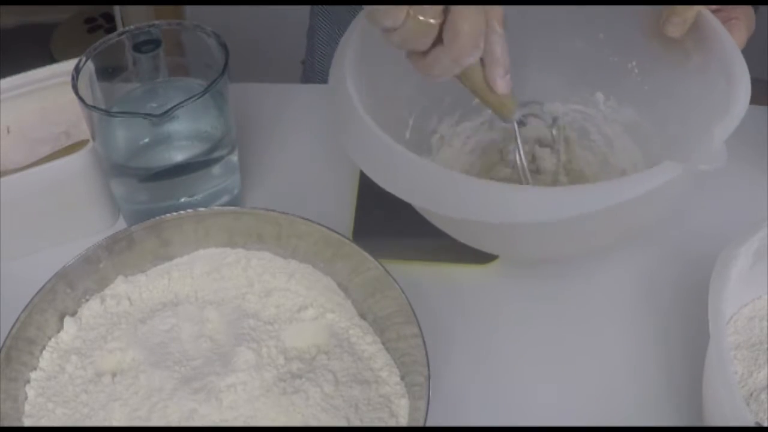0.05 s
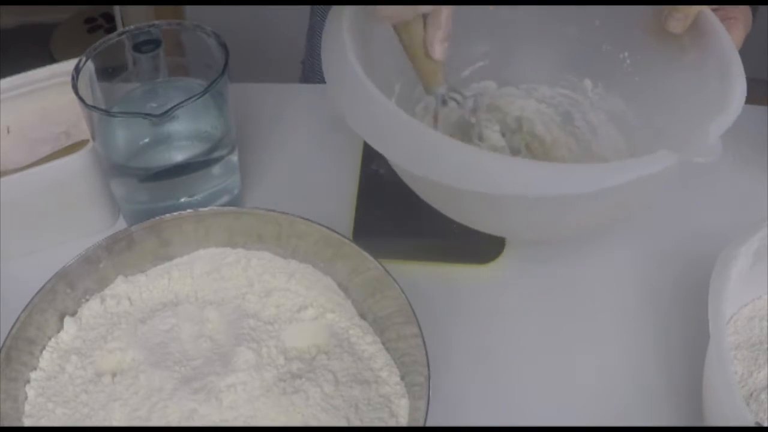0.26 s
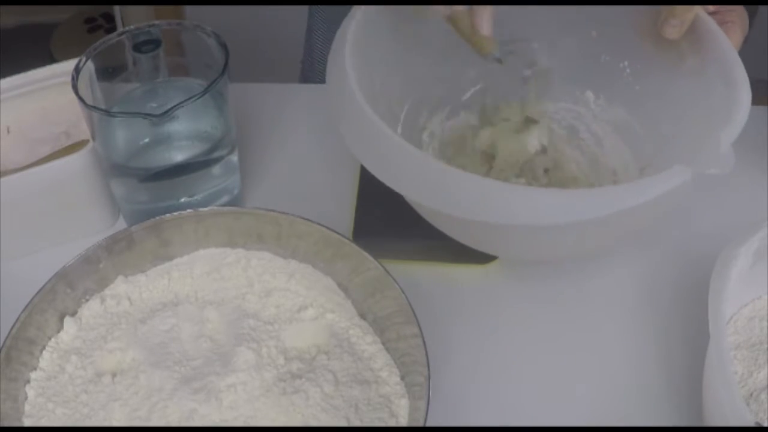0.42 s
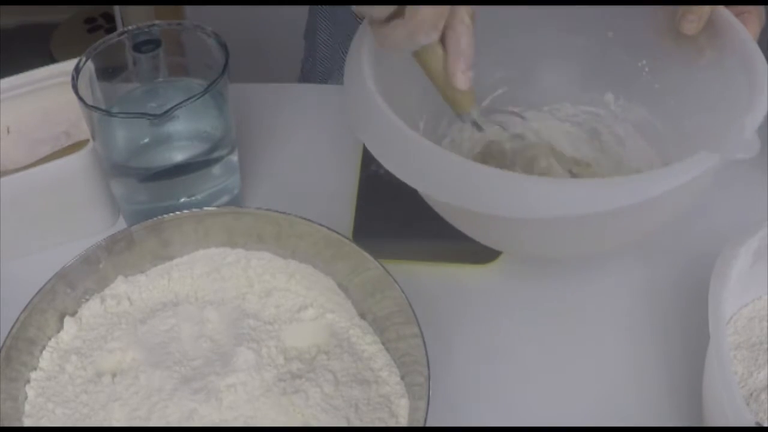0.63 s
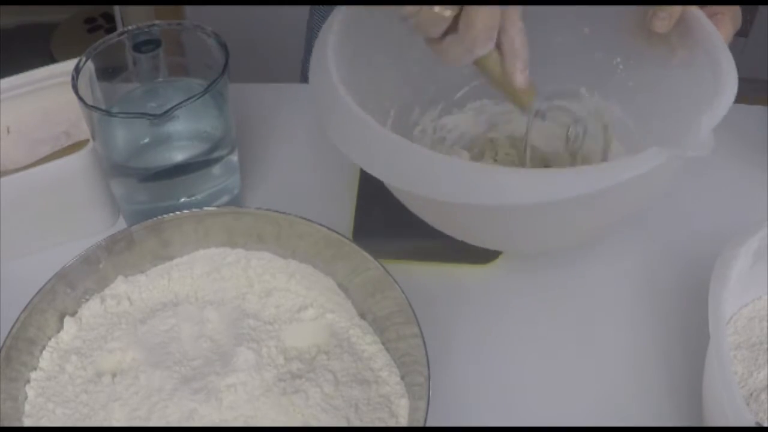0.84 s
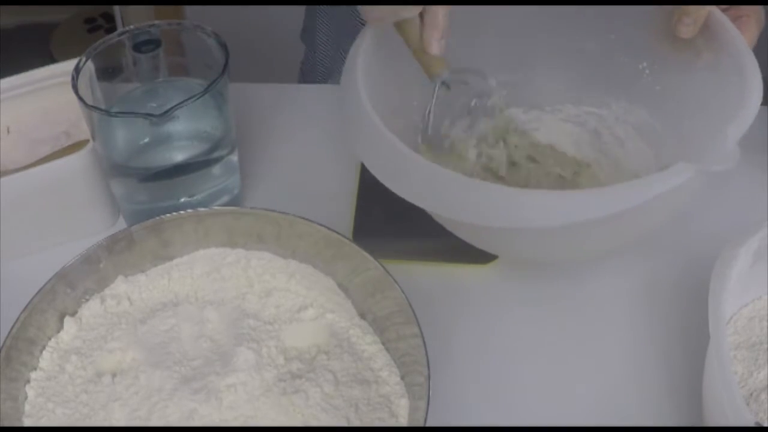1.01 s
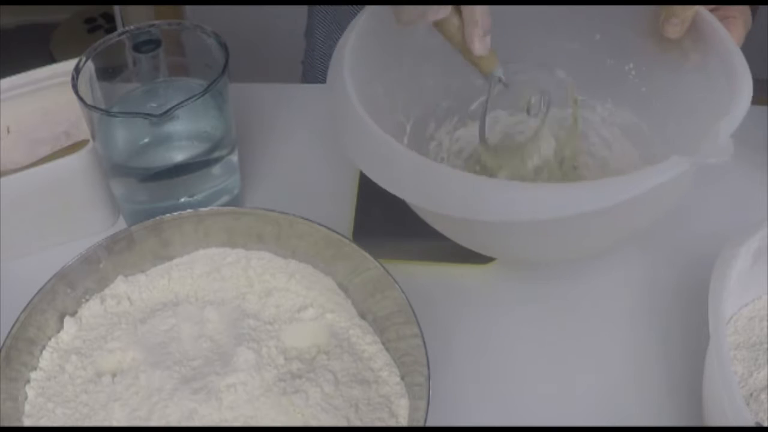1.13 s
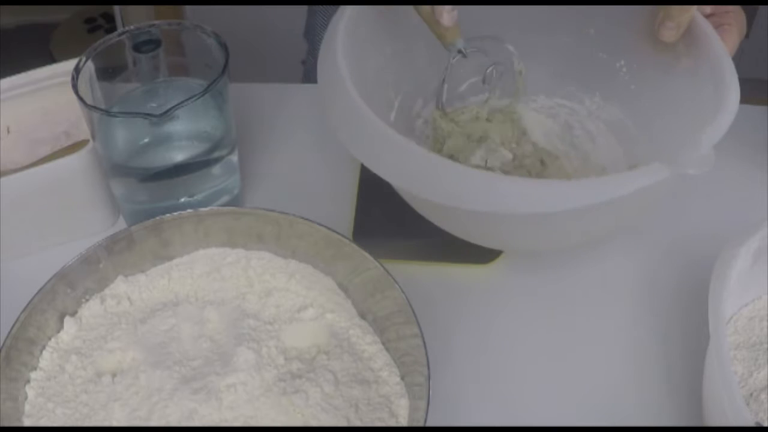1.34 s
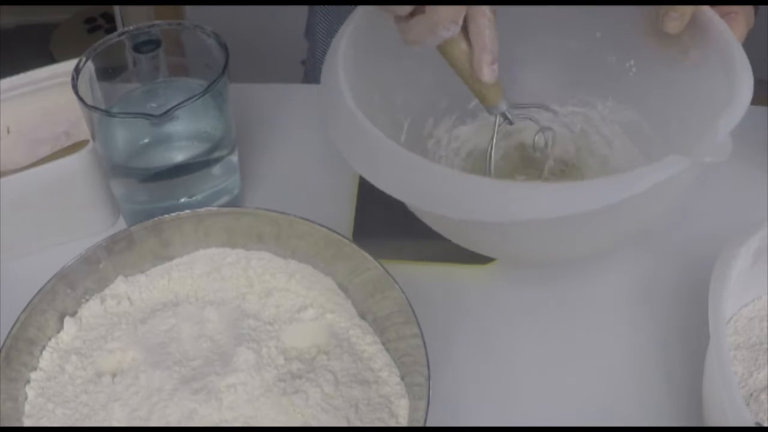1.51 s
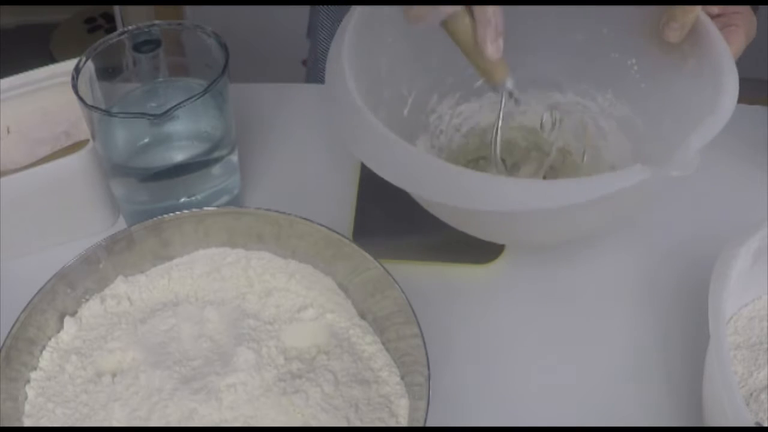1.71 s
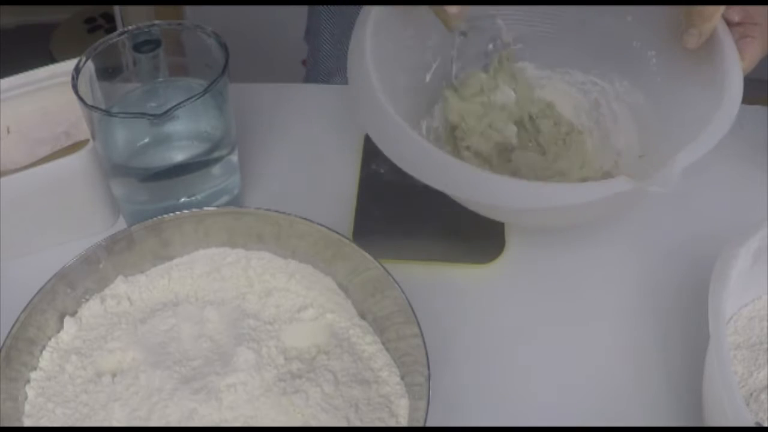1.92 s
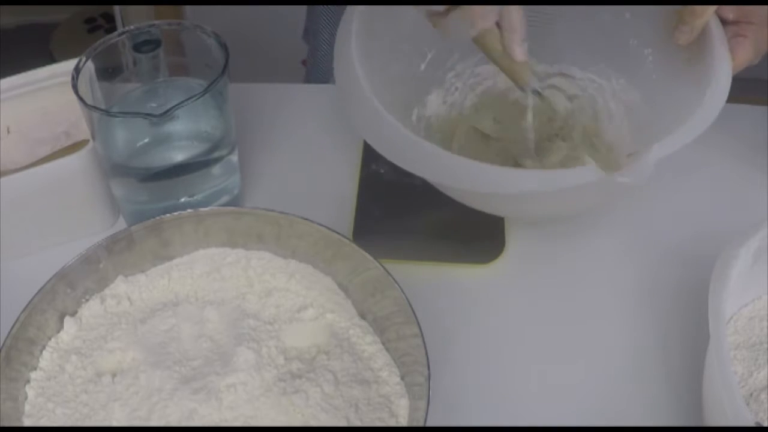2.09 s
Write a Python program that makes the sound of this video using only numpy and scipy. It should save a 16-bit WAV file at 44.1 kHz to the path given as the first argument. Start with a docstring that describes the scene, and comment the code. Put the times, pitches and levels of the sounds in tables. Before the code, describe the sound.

A wire whisk stirs stiff dough in a plastic bowl, rasping along the wall with one hollow thump. Softer knocks, wire clicks and a brief squeak follow, then more scraping, close by in a small, slightly echoing kitchen.

```python
"""A wire whisk works stiff dough round a plastic mixing bowl on a kitchen counter, in three turns.
First the wires rasp along the floury wall and knock the bowl, whose hollow thump carries into the counter.
Free wires graze and chirp faintly; the second turn brings softer knocks, clicks of wire on wire and rasps.
Then a wire sticks and squeaks, and the last turn clicks, knocks and rasps to the end.
A small hard kitchen reverberates throughout."""
import sys
import numpy as np
from scipy import signal
from scipy.fft import rfft, irfft, next_fast_len
from scipy.io import wavfile

SR = 44100
rng = np.random.default_rng(int(sys.argv[2]) if len(sys.argv) > 2 else 0)


def master(y):
    """Save y as 16-bit WAV."""
    cut = np.clip(np.atleast_2d(y).T, -1, 1)
    pcm = np.round(cut * 32767)  # scale
    wavfile.write(sys.argv[1], SR, pcm.astype(np.int16))


N = 94815
TIME = np.arange(N) / SR


def from_db(db):
    """Amplitude ratio of a level in decibels."""
    return 10 ** (np.asarray(db) / 20)


def unit_rms(x):
    """Normalisation to unit power."""
    return x / np.sqrt(np.mean(x ** 2) + 1e-20)


def at_hz(points, hz):
    """Interpolation on a log-frequency axis."""
    freqs, values = np.transpose(points)
    return np.interp(np.log(np.maximum(hz, 1)), np.log(freqs), values)


def colour(x, spectrum):
    """Spectral shaping by a table of gains."""
    n = x.shape[-1]
    size = next_fast_len(n)
    gain = from_db(at_hz(spectrum, np.fft.rfftfreq(size, 1 / SR)))
    return irfft(rfft(x, size) * gain, size)[..., :n]


def band_limit(x, order, hz, kind):
    """A maximally flat filter."""
    return signal.sosfilt(signal.butter(order, hz, kind, fs=SR, output="sos"), x)


def resonate(x, hz, width_hz):
    """A two-pole resonance with unit peak gain."""
    r = np.exp(-np.pi * width_hz / SR)
    feedback = [1, -2 * r * np.cos(2 * np.pi * hz / SR), r * r]
    return signal.lfilter(np.array([1, 0, -1]) * (1 - r * r) / 2, feedback, x + 1e-18)


def swell(peak_s, rise_s, fall_s):
    """A bell-shaped envelope; rise and fall are standard deviations."""
    return np.exp(-.5 * ((TIME - peak_s) / np.where(TIME < peak_s, rise_s, fall_s)) ** 2)


def slips(per_s=5000, spread_db=3.5):
    """Friction as shot noise: tiny random slips of wire over floury plastic, uneven in size."""
    sizes = from_db(spread_db * np.minimum(rng.exponential(1, N), 4)) * rng.choice([-1, 1], N)
    return sizes * (rng.random(N) < per_s / SR)


# Resonances of the bowl: pitch_hz, level_db, t60_s
BOWL_MODES = [(411.9, -25, 0.12), (445.7, -23.5, 0.1), (473.6, -29.5, 0.41), (516.4, -35, 0.19),
              (622, -47, 0.099), (900, -22, 0.024), (986, -32, 0.15), (1200, -29.5, 0.074),
              (1439, -28, .05), (1594, -22.5, .04), (1774, -22, .05), (1978, -34, 0.06), (2110, -30, 0.064),
              (2374, -19, 0.01), (2805, -26, 0.043), (3015, -24.5, .06)]
HOLLOW_TOP_HZ = 600  # modes of the hollow lie below, modes of the wall above
def bowl(friction, modes):
    """Forced vibration: friction drives a set of bowl modes, the strongest with unit gain."""
    strongest = max(from_db(db) * t60 for _, db, t60 in modes)
    return sum(from_db(db) * t60 / strongest * resonate(friction, hz, np.log(1000) / (np.pi * t60))
               for hz, db, t60 in modes)


# Spectra of the wall's rasp and the flour's hiss: frequency_hz, gain_db
RASP_SPECTRUM = [(300, -27.5), (740, -13), (900, 1), (1250, 2), (1800, -3.5), (2900, -1), (3400, 2.5),
                 (6000, 6), (12000, -26)]
HISS_SPECTRUM = [(800, -15.5), (1300, -23.5), (2500, -16), (4200, 0.5), (6000, 10), (8500, 14.5),
                 (10000, 9.5), (12000, 5)]
# Drags along the wall: peak_s, rise_s, fall_s, rasp_db, rasp_centre_hz, hiss_db, drone_db
DRAGS = [(0.011, 0.073, 0.018, -37.5, 1960, -43.5, -39.5), (0.098, 0.19, 0.091, -70.5, 846, -57.5, -67),
         (0.201, 0.013, 0.0061, -60, 1740, -82, -51.5), (0.211, 0.0011, 0.022, -36.5, 1620, -49, -22.5),
         (0.260, 0.0091, 0.0089, -36, 1970, -45.5, -29.5), (0.292, 0.012, 0.024, -37.5, 1834, -45, -62.5),
         (0.313, 0.0049, 0.02, -39.5, 2440, -44, -39), (0.619, 0.095, 0.064, -87.5, 2465, -73.5, -62),
         (0.704, 0.011, 0.019, -95.5, 3600, -60, -67), (0.754, 0.012, 0.0074, -101, 2400, -56, -62),
         (0.961, 0.0079, 0.035, -99, 2400, -67, -51.5), (0.998, 0.0078, 0.0023, -83, 3930, -45.5, -43.5),
         (1.024, 0.017, 0.087, -76, 3600, -57.5, -63), (1.09, 0.016, 0.031, -43.5, 2200, -49, -48.5),
         (1.109, 0.023, 0.014, -48, 1057, -56, -44.5), (1.14, 0.02, 0.013, -39.5, 1970, -48, -66),
         (1.209, 0.037, 0.027, -45.5, 2150, -52, -52.5), (1.535, 0.0057, 0.014, -92, 2820, -65.5, -97),
         (1.587, 0.0078, 0.076, -61, 1110, -95, -50), (1.674, 0.012, 0.012, -49.5, 2900, -39, -68.5),
         (1.699, 0.02, 0.028, -59.5, 2830, -67, -45), (1.753, 0.022, 0.026, -41, 2050, -48, -46.5),
         (1.808, 0.0046, 0.0075, -36, 2430, -55, -60.5), (1.851, 0.025, 0.051, -47.5, 2090, -48.5, -51.5),
         (1.887, 0.015, 0.013, -33.5, 2380, -47, -49.5), (1.966, 0.0041, 0.012, -38, 2110, -48, -60),
         (2.016, 0.036, 0.081, -44.5, 1880, -49.5, -46.5), (2.143, 0.019, 0.036, -37.5, 1960, -46, -35)]
def scrapes(direct_db=-4, wall_ring_db=2, catch_db=2):
    """Sliding friction: each drag judders, the wall rasps, the flour hisses and the hollow drones."""
    grit = colour(slips(), RASP_SPECTRUM)
    rasp = hiss_power = drone_power = 0
    for peak_s, rise_s, fall_s, rasp_db, centre_hz, hiss_db, drone_db in DRAGS:
        push = swell(peak_s, rise_s, fall_s)
        rub = resonate(np.roll(grit, rng.integers(N)), centre_hz, width_hz=500)
        rub = band_limit(rub, 2, 0.69 * centre_hz, "high")
        rasp += from_db(rasp_db) * push * unit_rms(rub)
        hiss_power += (from_db(hiss_db) * push) ** 2
        drone_power += (from_db(drone_db) * push) ** 2
    # The wires catch and let go unevenly, modulating rasp and hiss.
    judder = unit_rms(resonate(rng.standard_normal(N), hz=185, width_hz=230))
    catches = unit_rms(from_db(catch_db * np.clip(judder, -2, 2)))
    rasp = band_limit(rasp * catches, 4, 770, "high")
    wall = bowl(rasp, [mode for mode in BOWL_MODES if mode[0] > HOLLOW_TOP_HZ])
    hollow = signal.hilbert(bowl(slips(), [mode for mode in BOWL_MODES if mode[0] < HOLLOW_TOP_HZ]))
    steadied = np.real(hollow) / np.sqrt(np.abs(hollow))  # halves the level swings in decibels
    drone = np.sqrt(drone_power) * unit_rms(band_limit(steadied, 4, [345, HOLLOW_TOP_HZ], "band"))
    hiss = np.sqrt(hiss_power * catches) * unit_rms(colour(slips(), HISS_SPECTRUM))
    return from_db(direct_db) * rasp + from_db(wall_ring_db) * wall + hiss + drone


# Thin notes of the whisk: pitch_hz, gain_db
WIRE_NOTES = [(3820, -1.5), (4200, -2), (4720, 6), (5130, 1), (5380, 5), (5815, -1.5), (6140, 1),
              (7100, 2.5), (8580, -7)]
def wires(friction):
    """Narrow resonances draw the wires' notes out of broadband friction."""
    return sum(from_db(db) * resonate(friction, hz, width_hz=45) for hz, db in WIRE_NOTES)


def whisk(friction, notes_db=-4):
    """Sympathetic vibration: damped by dough, the wires sing faintly along with what rubs them."""
    return friction + from_db(notes_db) * wires(friction)


# Reverberation times of the kitchen: frequency_hz, t60_s
ROOM_DECAY = [(200, 0.82), (450, 0.47), (1000, 0.56), (2500, 0.37), (6000, 0.67), (11000, 0.56)]
# Side signal of the tail, relative to its mid signal: frequency_hz, gain_db
ROOM_SIDE_SPECTRUM = [(200, -7.5), (450, -15), (1000, 1.5), (2000, -14.5), (5000, -45), (8000, -45.5),
                      (12000, -25.5)]
def kitchen(x, delay_s=0.0027, tail_s=.8):
    """Diffuse reverberation: a noise tail decays band by band, much alike in both ears."""
    t = TIME[:int(tail_s * SR)]
    hz = np.fft.rfftfreq(len(t), 1 / SR)
    white, tail = rfft(rng.standard_normal((2, len(t)))), 0
    for band_hz, t60 in ROOM_DECAY:
        share = at_hz([(f, f == band_hz) for f, _ in ROOM_DECAY], hz)
        decay = from_db(-60 * t / t60) * (t > delay_s)
        tail += irfft(white * share, len(t)) * decay / np.linalg.norm(decay)
    mid, side = tail[0], colour(tail[1], ROOM_SIDE_SPECTRUM)
    return np.array([signal.fftconvolve(x, ear)[:N] for ear in (mid + side, mid - side)])


# Spectrum of the background: frequency_hz, gain_db
BACKGROUND_SPECTRUM = [(60, -3.5), (450, -7), (1000, -33), (3000, -26), (7000, -6.5), (12000, -8)]
def background(level_db=-78.5):
    """Faint stationary noise, partly correlated between the ears."""
    noise = rng.standard_normal(N) + 0.7 * rng.standard_normal((2, N))
    return from_db(level_db) * unit_rms(colour(noise, BACKGROUND_SPECTRUM))


# Blows of the whisk on the bowl: peak_s, level_db, pitch_hz, wall_ring_db, right_ear_lead_rad
BLOWS = [(0.2144, -8, 446.3, -2.5, 0.58), (0.236, -52, 475, -1, 0.4), (0.248, -32.5, 496, -17, .35),
         (0.968, -30, 424, -12, 0.13), (0.987, -42, 513, -3.5, 0.12), (1.056, -45, 420, 23, 0.092),
         (1.088, -34.5, 446, -11, 0.076), (1.598, -26, 418, 12.5, 0.14), (1.718, -34.5, 428, -11, .07),
         (1.903, -34, 457, -48, 0.036), (1.999, -37, 480, -14, 0.052), (2.119, -34, 445, -10, 0.056)]
THUMP_RISE_S, THUMP_FALL_S = 0.002, 0.0045  # for a blow at full strength
def knocks(wall_db_per_octave=-13):
    """Cushioned impact: dough softens the blow, so the bowl thumps and its high modes ring weakly."""
    out = np.zeros((2, N))
    for peak_s, level_db, pitch_hz, wall_db, lead_rad in BLOWS:
        t = TIME - peak_s
        rise_s = THUMP_RISE_S * from_db(-.14 * level_db)  # gentler blows swell more slowly
        thump = swell(peak_s, rise_s, THUMP_FALL_S) * np.exp(2j * np.pi * pitch_hz * t)
        rings = 0
        for hz, mode_db, t60 in BOWL_MODES:
            if hz > HOLLOW_TOP_HZ:
                mode_db += wall_db + wall_db_per_octave * np.log2(hz / pitch_hz)
            rings += from_db(mode_db - 60 * np.maximum(t, 0) / t60) * np.exp(2j * np.pi * hz * t)
        ear_phase = np.exp(1j * lead_rad * np.array([[-.5], [.5]]))
        out += from_db(level_db) * np.real((thump + rings * swell(peak_s, rise_s, np.inf)) * ear_phase)
    return band_limit(out, 2, 148, "high")  # a small bowl radiates little bass


# Shifts of the bowl on the counter: peak_s, width_s, level_db
BOWL_SHIFTS = [(0.21, 0.017, -60), (0.57, 0.029, -67), (0.712, 0.05, -70)]
# Spectrum of their rumble: frequency_hz, gain_db
RUMBLE_SPECTRUM = [(20, 12), (50, -1), (100, -14.5), (200, -18.5), (320, -30.5)]
def counter(pitch_hz=232, thud_db=-55, t60_s=0.2):
    """Structure-borne sound: the first, hardest knock rings the counter; the shifting bowl rumbles."""
    t = np.maximum(TIME - BLOWS[0][0] + 2 * THUMP_RISE_S, 0)
    thud = from_db(thud_db - 60 * t / t60_s) * np.sin(2 * np.pi * pitch_hz * t)
    shifting = sum(from_db(db) * swell(peak_s, width_s, width_s) for peak_s, width_s, db in BOWL_SHIFTS)
    noise = rng.standard_normal(N) + rng.standard_normal((2, N))
    return thud + shifting * unit_rms(colour(noise, RUMBLE_SPECTRUM))


# Light touches of free wires on the wall: peak_s, width_s, level_db
LIGHT_TOUCHES = [(0.701, 0.023, -68.5), (1.46, 0.061, -73)]
def grazes():
    """Resonant excitation: wires clear of the dough brush the wall, and only their notes are heard."""
    touch = sum(from_db(db) * swell(peak_s, width_s, width_s) for peak_s, width_s, db in LIGHT_TOUCHES)
    return touch * unit_rms(wires(slips()))


# Brief slips of a wire: peak_s, width_s, pitch_hz, level_db
WIRE_CHIRPS = [(0.704, 0.0091, 3655, -65.5), (0.73, 0.01, 2390, -73.5)]
def chirps():
    """Friction-induced vibration: a slipping wire gives a short burst of one pitch."""
    return np.sqrt(2) * sum(from_db(db) * swell(peak_s, width_s, width_s) * np.sin(2 * np.pi * hz * TIME)
                            for peak_s, width_s, hz, db in WIRE_CHIRPS)


# Resonances of struck wires: pitch_hz, width_hz, gain_db, group (0 low, 1 middle, 2 high)
CLICK_MODES = [(3150, 115, -1, 0), (3600, 265, 1.5, 0), (4105, 210, 5, 0), (5910, 2100, -6.5, 1),
               (7300, 470, 3, 1), (9300, 370, 1, 2), (10860, 1500, -6, 2)]
# Contacts of wire on wire: start_s, level_db, low_ring_db, middle_ring_db, high_ring_db
WIRE_CONTACTS = [(0.9885, -39, -12, -8, 0), (0.9927, -35, -10, -3, -1), (1.0024, -24, 0, -8, -1),
                 (1.007, -22.5, 0, -6, -2), (1.031, -35, -5, -4, -2), (1.6343, -33, -18, 0, -20),
                 (1.639, -34, -18, 0, -20), (1.6543, -35, -14, 0, -5), (1.6587, -31, -14, 0, -9),
                 (1.6679, -34, -14, -3, 0), (1.6724, -31, -10, 0, -3), (1.6752, -25, -6, 0, -8),
                 (1.678, -26, -16, 0, -10), (1.6797, -18, -11, 0, -6)]
def clicks(gain_db=17, grit_s=.0005, grit_share=.3):
    """Damped impulse response: gritty contacts briefly ring wires clogged with dough."""
    drives, t = np.zeros((3, N)), TIME[:SR // 100]
    for start_s, level_db, *ring_db in WIRE_CONTACTS:
        grit = rng.standard_normal(len(t)) * np.exp(-t / grit_s)
        contact = (t == 0) + grit_share * grit / np.linalg.norm(grit)
        start = int(start_s * SR)
        for drive, share_db in zip(drives, ring_db):
            drive[start:start + len(t)] += from_db(level_db + share_db + gain_db) * contact
    rings = sum((-1) ** k * from_db(db) * resonate(drives[int(group)], hz, width_hz)
                for k, (hz, width_hz, db, group) in enumerate(CLICK_MODES))
    return band_limit(rings, 4, 2600, "high")


# A squeak that slides up and sags twice: time_s, pitch_hz, level_db, roughness (scales the jitter)
SQUEAK_PATH = [(1.35, 2380, -72, 1.12), (1.406, 2400, -65, 0.38), (1.43, 2560, -71, .7),
               (1.448, 2700, -73, 1), (1.457, 2945, -52, 0), (1.487, 2925, -44.5, 0),
               (1.518, 2895, -66, .2), (1.535, 2980, -52.5, 0), (1.558, 2912, -45.5, 0),
               (1.583, 2835, -61, .2)]
def squeak(jitter_hz=169):
    """Stick-slip oscillation: rough while the wire slides, nearly pure once it grips."""
    times_s, *columns = np.transpose(SQUEAK_PATH)
    pitch_hz, level_db, roughness = (np.interp(TIME, times_s, column) for column in columns)
    jitter = jitter_hz * unit_rms(resonate(rng.standard_normal(N), hz=80, width_hz=160))
    phase = 2 * np.pi * np.cumsum(pitch_hz + roughness * jitter) / SR
    sounding = (TIME > times_s[0]) * (TIME < times_s[-1])
    return np.sqrt(2) * from_db(level_db) * sounding * np.sin(phase)


def scene():
    """Superposition: direct sound from whisk and bowl ahead, the kitchen's reverberation around them."""
    scrape, knock, click = whisk(scrapes()), knocks(), whisk(clicks())
    tones = chirps() + squeak() + grazes()
    to_room = (from_db(-6.5) * scrape + from_db(-9.5) * knock.mean(0)
               + from_db(-5.5) * click + from_db(-7) * tones)
    return background() + scrape + knock + click + tones + kitchen(to_room) + counter()


def record(dry, cutoff_hz=12150):
    """An elliptic low-pass filter cuts the top treble steeply."""
    return signal.sosfilt(signal.ellip(10, .3, 70, cutoff_hz, fs=SR, output="sos"), dry)


dry = scene()
out = record(dry)
master(out)
```